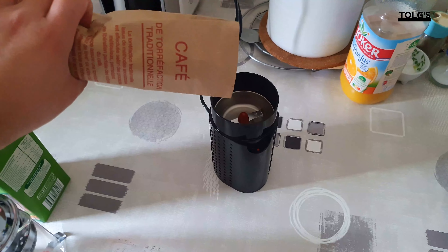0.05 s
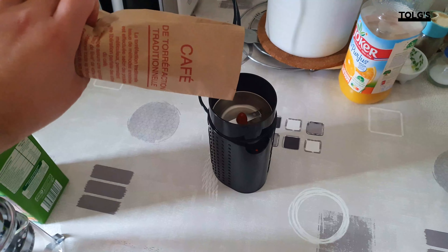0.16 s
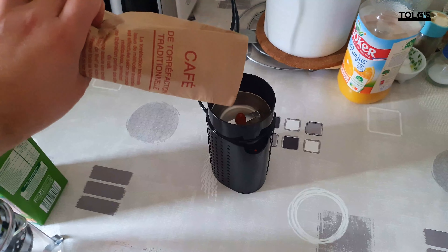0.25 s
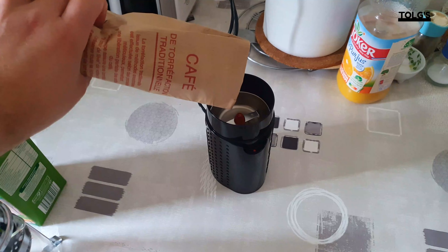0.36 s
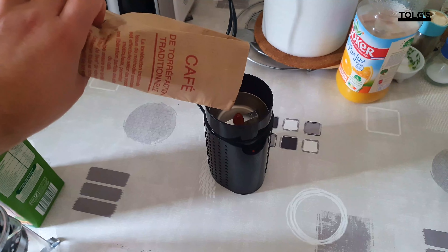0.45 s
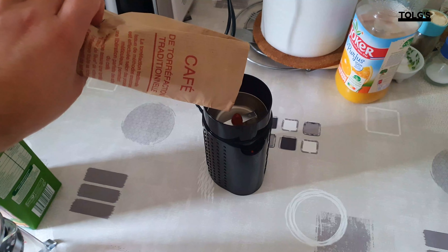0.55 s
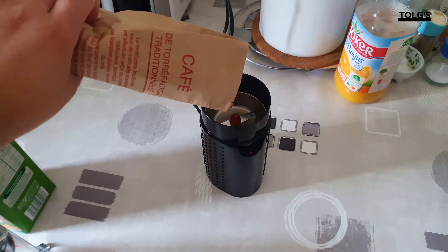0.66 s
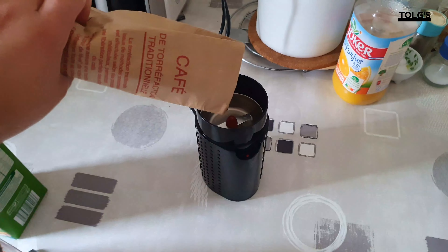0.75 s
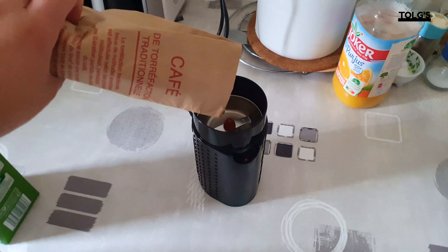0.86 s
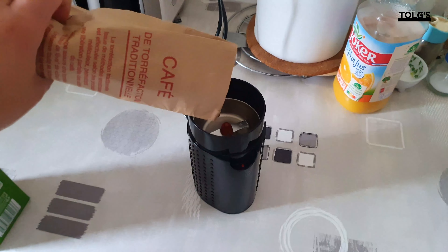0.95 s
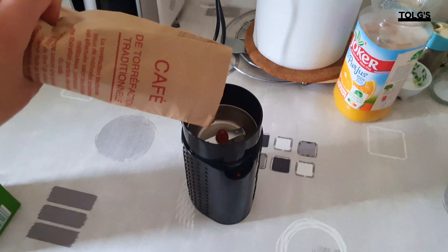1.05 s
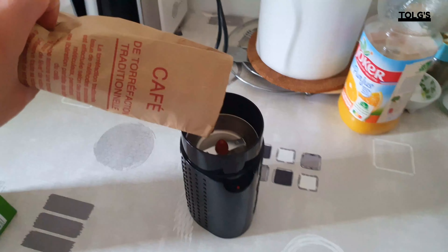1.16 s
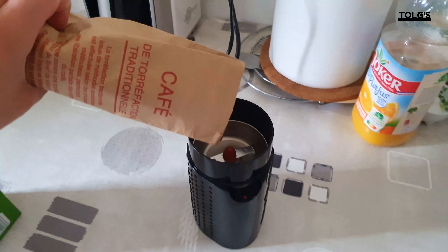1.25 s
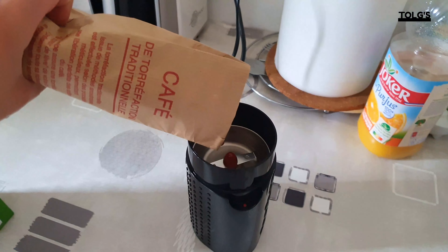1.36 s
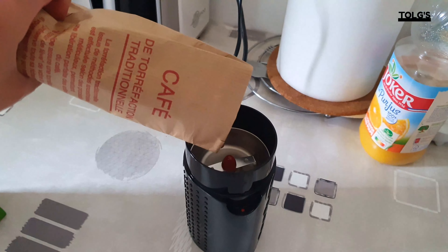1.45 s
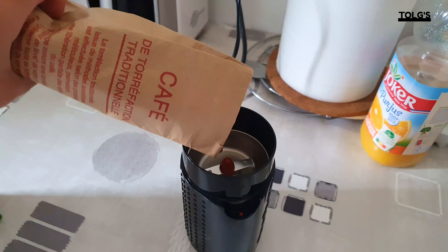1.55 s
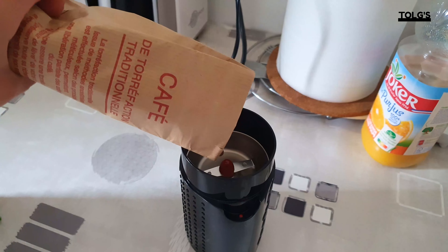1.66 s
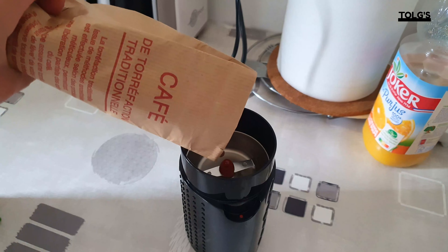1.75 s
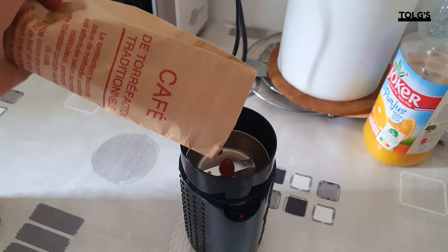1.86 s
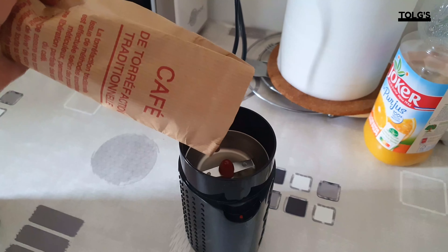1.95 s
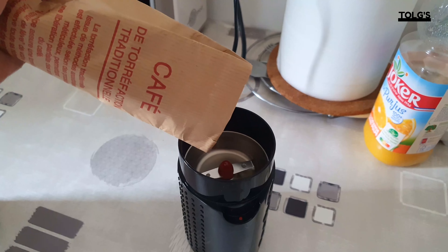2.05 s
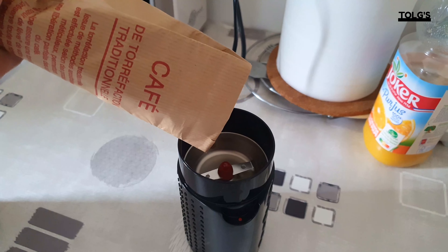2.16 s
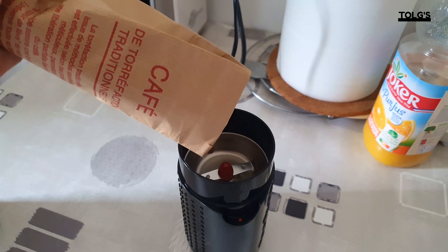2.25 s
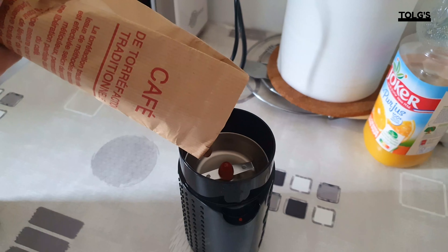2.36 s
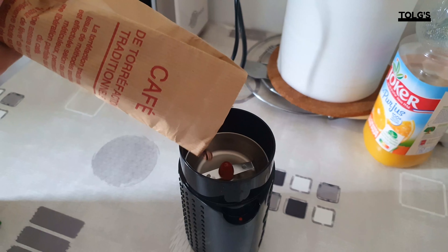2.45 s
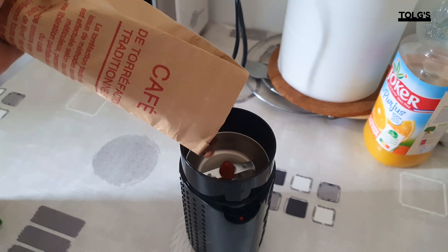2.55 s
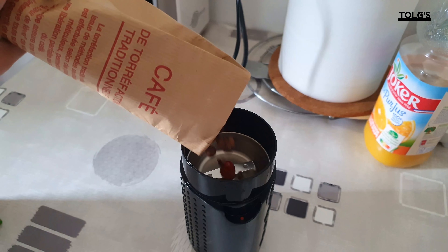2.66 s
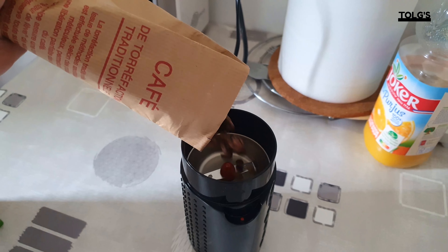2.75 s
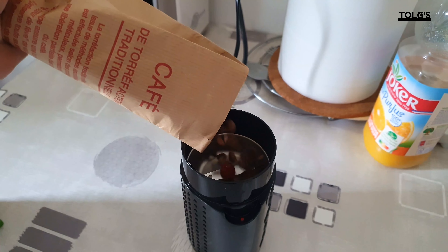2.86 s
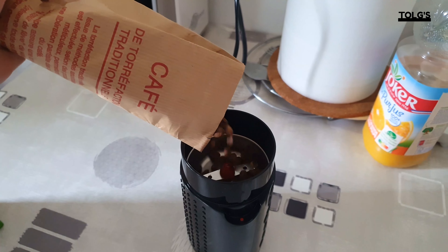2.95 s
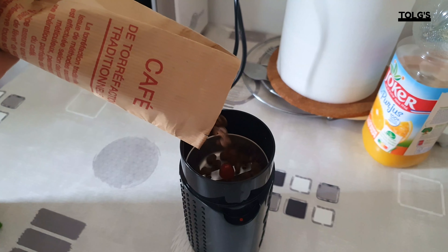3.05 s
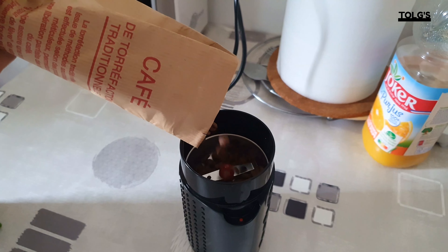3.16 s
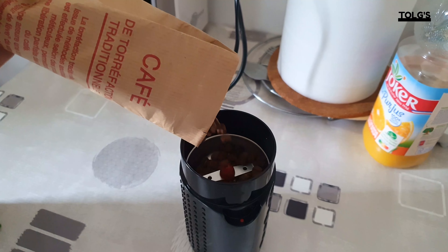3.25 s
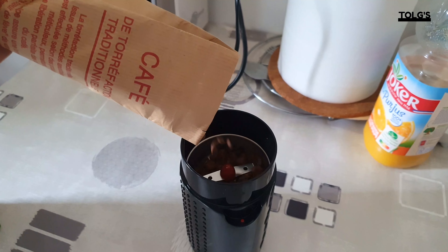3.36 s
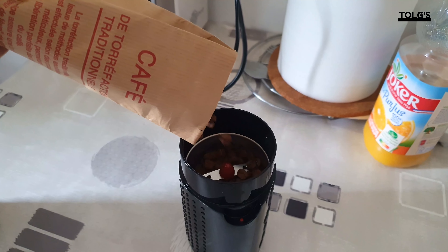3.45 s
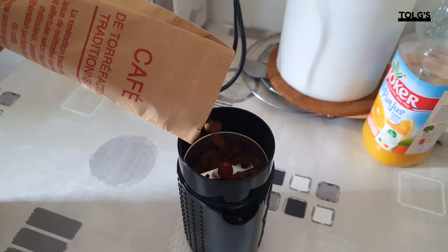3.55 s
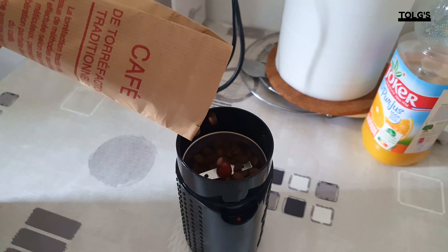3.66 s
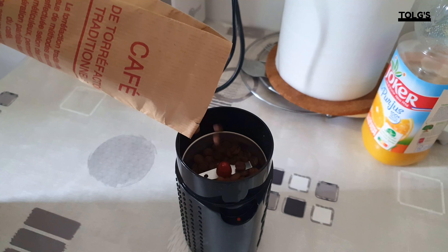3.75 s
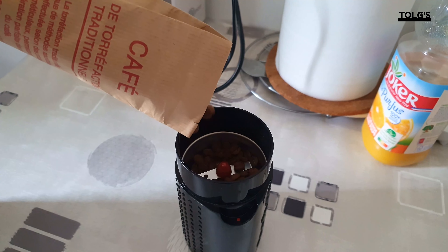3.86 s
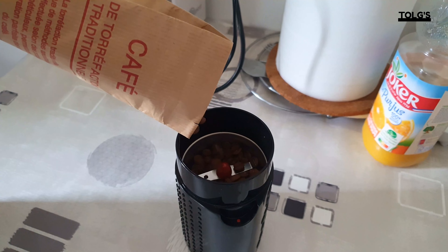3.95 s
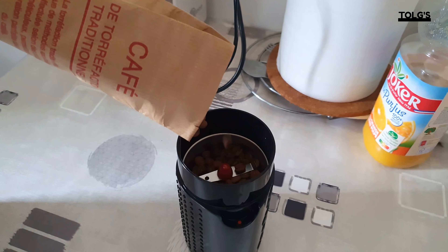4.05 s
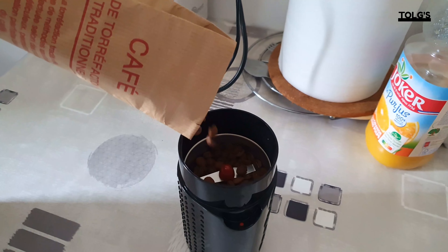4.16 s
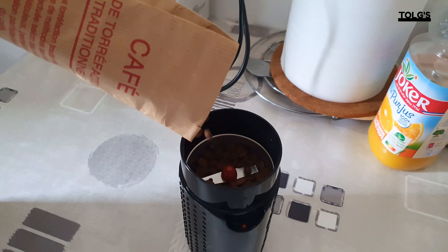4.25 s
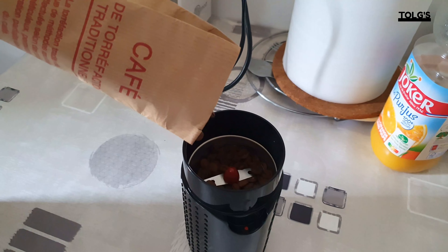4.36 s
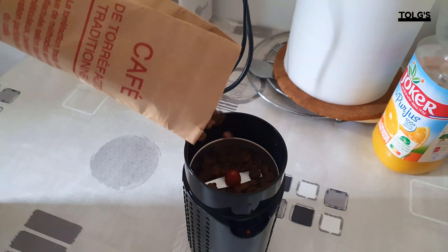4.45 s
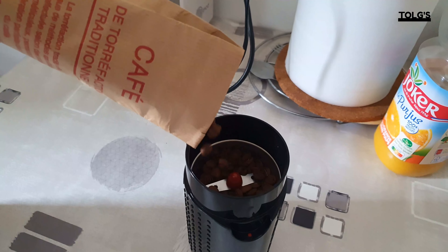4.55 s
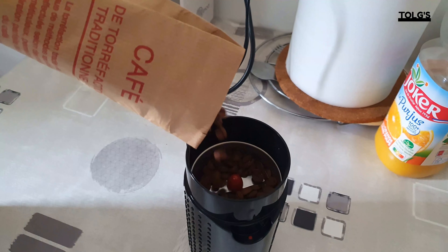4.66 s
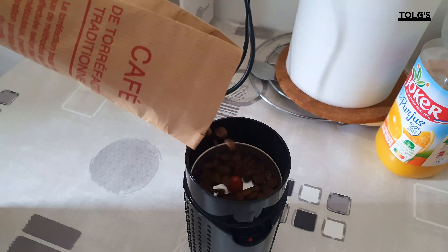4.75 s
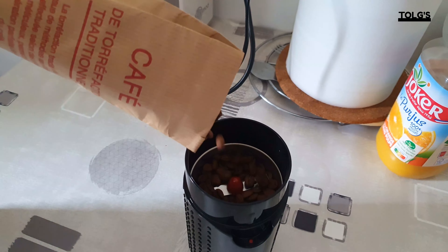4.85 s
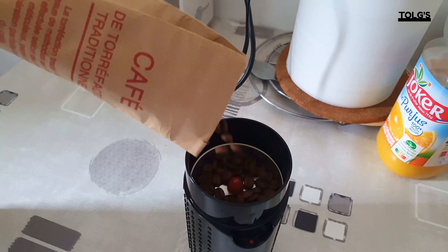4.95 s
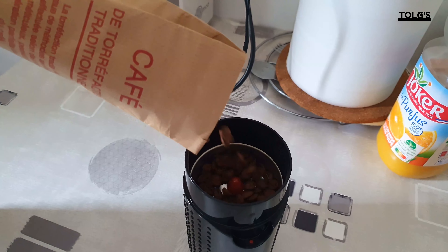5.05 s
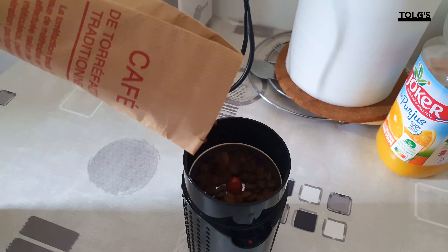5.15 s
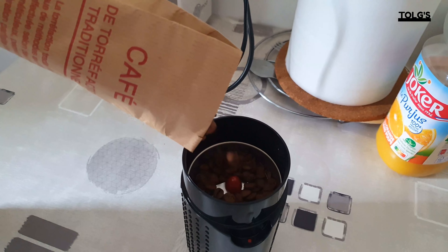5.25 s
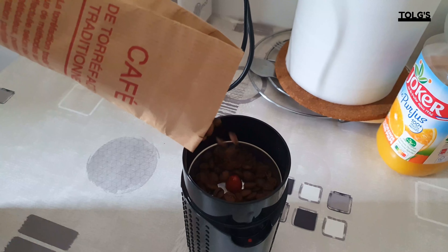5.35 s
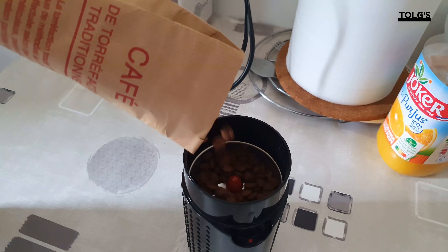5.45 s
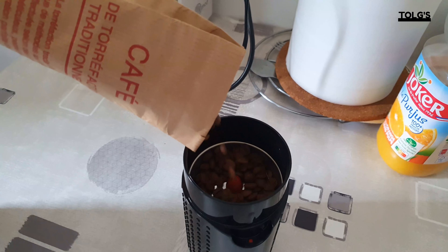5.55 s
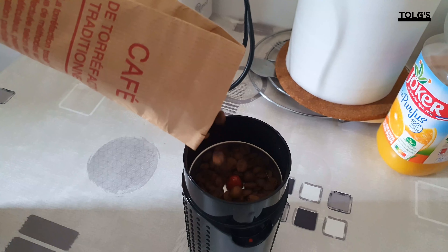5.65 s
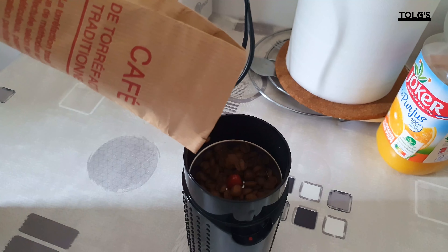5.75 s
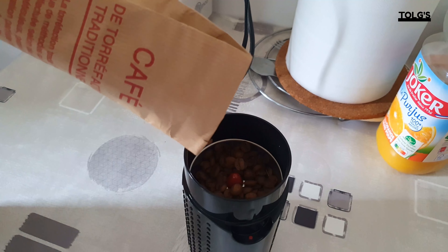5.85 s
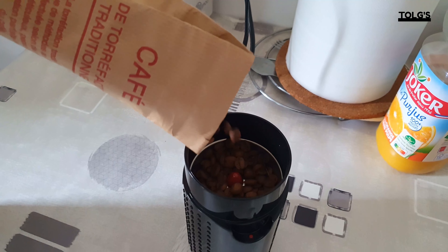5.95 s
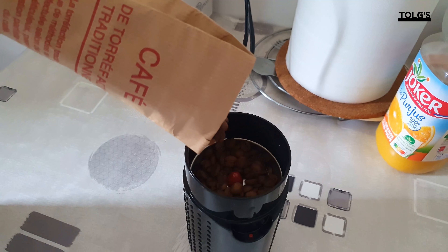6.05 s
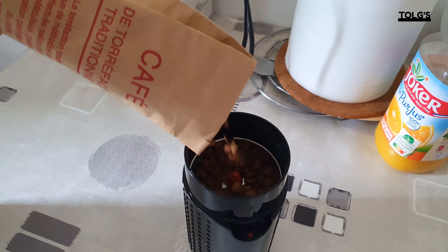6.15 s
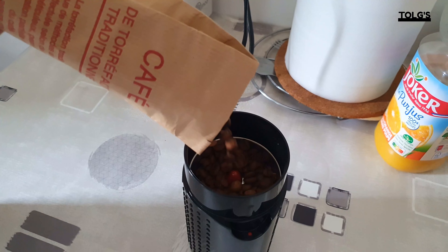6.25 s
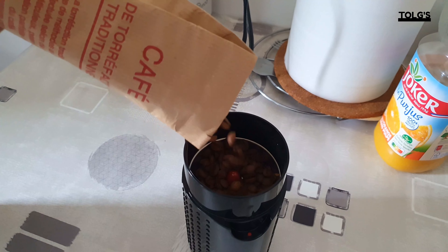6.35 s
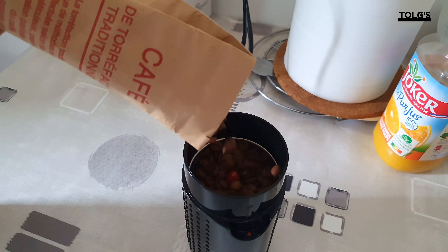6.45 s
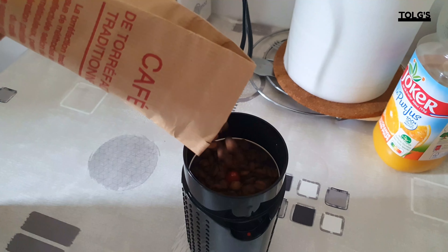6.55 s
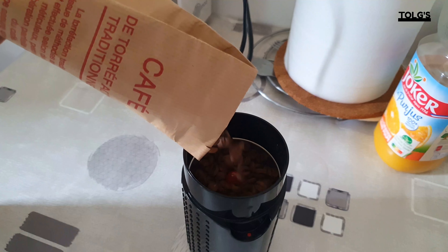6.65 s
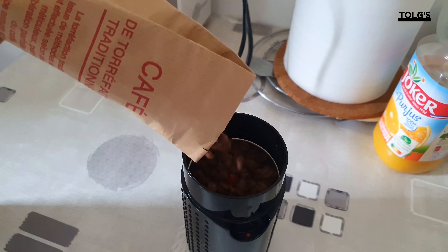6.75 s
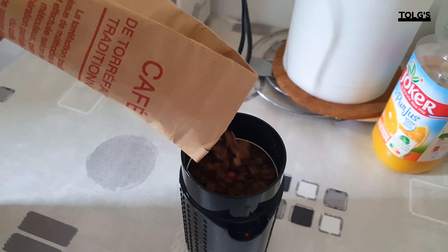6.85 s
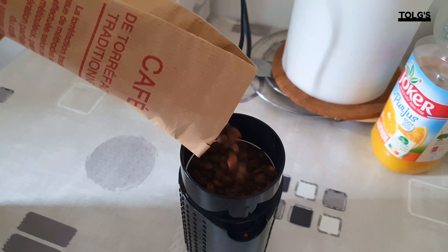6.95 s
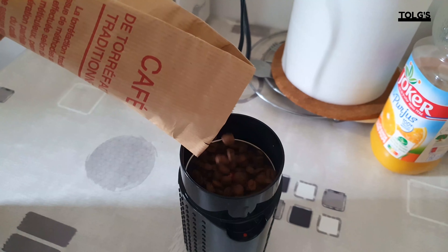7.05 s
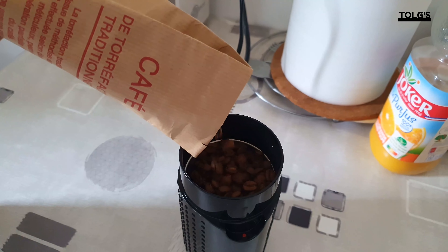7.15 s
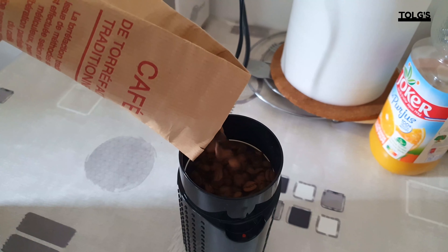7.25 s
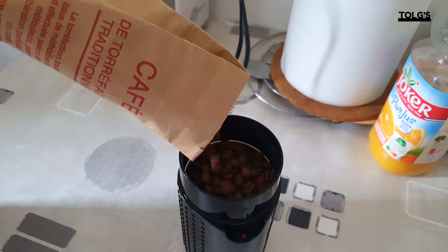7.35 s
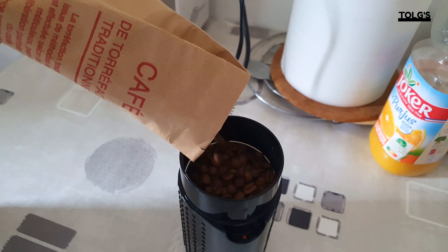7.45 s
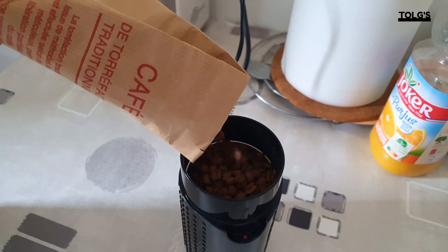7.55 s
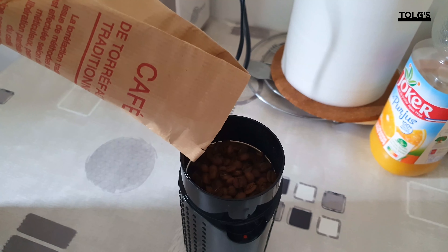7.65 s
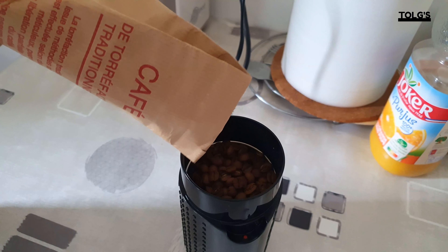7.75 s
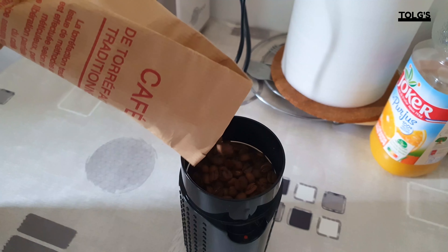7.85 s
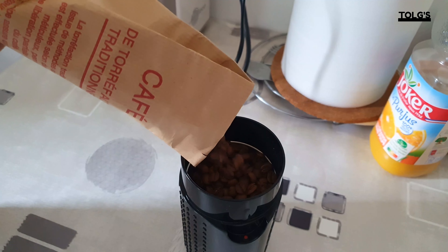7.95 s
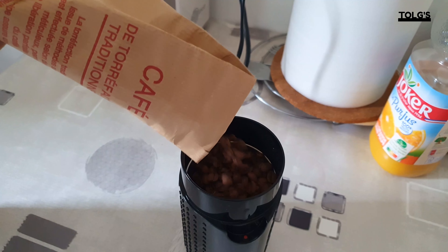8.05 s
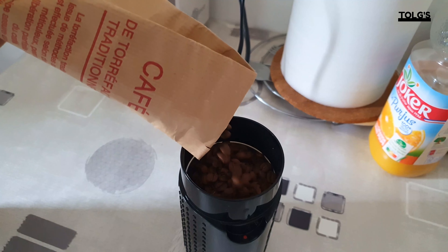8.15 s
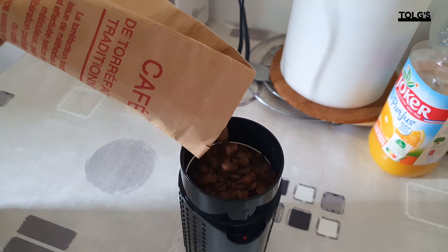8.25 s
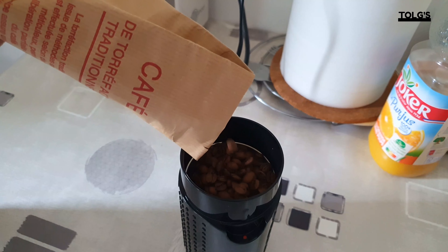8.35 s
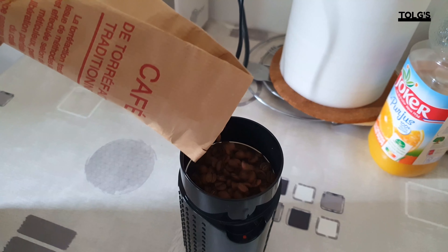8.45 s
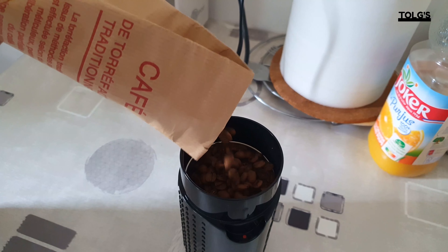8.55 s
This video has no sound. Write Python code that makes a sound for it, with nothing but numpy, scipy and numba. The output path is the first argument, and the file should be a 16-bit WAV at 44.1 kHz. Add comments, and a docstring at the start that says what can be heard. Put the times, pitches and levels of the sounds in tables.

```python
"""In a kitchen, close to a phone, roasted coffee beans slide from a tilted paper bag into a steel grinder bowl.
Each bean clicks, bounces and stirs the beans already there. The hits make the steel ring, less and less
as the heap covers it. The bag rustles as beans scrape the paper, knocks as they tap it and booms as
their weight shifts; its creases snap. Behind it all are one soft, low creak and a quiet, steady hiss."""
import sys
import numpy as np
from scipy import signal
from scipy.fft import rfft, irfft, next_fast_len
from scipy.io import wavfile
from scipy.ndimage import uniform_filter1d
from numba import njit

SR = 44100
rng = np.random.default_rng(int(sys.argv[2]) if len(sys.argv) > 2 else 0)


def materialize(psi):
    """Save the field psi as 16-bit PCM at rate SR to the path in sys.argv[1].

    A 1-D psi becomes a single channel; in a 2-D psi each row is a channel.
    """
    bounded = np.clip(np.atleast_2d(psi).T, -1, 1)
    quanta = np.round(bounded * 32767).astype(np.int16)
    wavfile.write(sys.argv[1], SR, quanta)


N = 379260

# A few faint clicks, then beans landing one by one: start_s, level_db, treble_share_db, knock_hz, tick_hz
CLICKS_AND_LANDINGS = [(2.2684, -50, -11, 3450, 9130), (2.2914, -39.5, -21, 3160, 7930),
                       (2.3457, -60, -8, 3370, 8720), (2.3951, -44, -11, 3540, 8300),
                       (2.4155, -50, -5, 3520, 8740), (2.4789, -45, -6, 3320, 12100),
                       (2.4968, -25.5, -4, 3950, 11900), (2.5387, -39, 0, 3110, 12600),
                       (2.5792, -26, -2, 4320, 9300), (2.624, -17.5, -9, 5030, 8450),
                       (2.641, -17.5, 0, 5230, 12700), (2.6809, -15.5, -11, 4600, 8600),
                       (2.7304, -14, -10, 4500, 8330), (2.7479, -17, -8, 4660, 13000),
                       (2.7622, -13, -9, 4600, 8350), (2.8006, -14, 0, 4370, 12900),
                       (2.858, -22, -21, 4430, 11600), (2.9239, -17, -5, 4350, 8400),
                       (2.98, -18, -8, 4300, 8200), (3.0242, -36, -3, 4570, 11600),
                       (3.0635, -19.5, 0, 4430, 12100), (3.096, -12.5, -7, 4240, 8600),
                       (3.1209, -15.5, -5, 4700, 8550), (3.1405, -13.5, -13, 4460, 8430),
                       (3.1911, -15, -2, 4660, 8500), (3.2336, -16.5, -2.5, 4670, 8770),
                       (3.2706, -16, -0.5, 4470, 8600), (3.3399, -17, -4, 4560, 8500),
                       (3.3723, -22, -1, 4680, 8360), (3.385, -18.5, -4, 5000, 11800),
                       (3.4172, -19, -2.5, 4430, 11400), (3.499, -24, 2, 5600, 11600),
                       (3.5415, -34, 1, 4270, 11400), (3.5604, -25.5, 0, 4940, 12000),
                       (3.573, -19.5, -4, 5070, 11700), (3.5933, -17, -6, 4580, 11400),
                       (3.6233, -14, 1, 6240, 11000), (3.6557, -19, -9, 5530, 13900),
                       (3.6698, -19, -6, 5730, 11500), (3.7058, -20, -4, 4600, 8410),
                       (3.7491, -22.5, -6, 5240, 10700), (3.8118, -21, -5.5, 4640, 8190),
                       (3.831, -17.5, -4, 4500, 11500), (3.8878, -20.5, -1, 6050, 11500),
                       (3.9705, -21.5, -12, 5200, 8550), (4.0027, -29, -6, 4950, 12200),
                       (4.018, -29, -11, 5050, 8200), (4.0665, -25.5, -5, 4700, 8590),
                       (4.1243, -23.5, -1.5, 4500, 12000), (4.153, -35, 1, 5080, 11800),
                       (4.177, -29.5, 1, 4600, 12200), (4.2413, -27, -3.5, 4940, 11800),
                       (4.2872, -20.5, -0.5, 4830, 11100), (4.354, -32.5, -10, 5200, 8830),
                       (4.3678, -30.5, -3, 3890, 12300), (4.3824, -24, 0.5, 3100, 14500),
                       (4.411, -28.5, -3.5, 5800, 11700), (4.4644, -35, -6, 5540, 10900),
                       (4.5062, -18.5, -8, 4900, 11800), (4.5641, -18, -16, 4600, 15300),
                       (4.5836, -32, 3, 4900, 15000), (4.607, -24, -4, 5100, 11700),
                       (4.6579, -27, -5, 4480, 15400), (4.6701, -16, -5, 4950, 11600),
                       (4.7327, -32, -7, 4940, 9830), (4.7761, -14.5, -7.5, 4600, 11700),
                       (4.7935, -18.5, 1, 4870, 12900), (4.8171, -32, -3, 4880, 11500),
                       (4.8764, -19, -2, 5100, 11400), (4.9345, -23.5, -17, 4660, 12600),
                       (4.9489, -22.5, -6, 4700, 8000), (5.0103, -31, -16, 3280, 11100),
                       (5.0317, -21, -8, 4900, 11700), (5.062, -31, -4, 4620, 13200),
                       (5.076, -26.5, 1, 4860, 13700), (5.105, -25, -3, 4230, 13000),
                       (5.1328, -18.5, -13, 4400, 11600), (5.1586, -19, -10, 4830, 11700),
                       (5.2033, -17.5, -6.5, 4140, 15400), (5.2463, -29, -7, 5120, 10100),
                       (5.2719, -24.5, -7, 4870, 11600), (5.299, -21, -2, 4700, 14400),
                       (5.3614, -38, -15, 5460, 7850), (5.3779, -17.5, -7, 4830, 7900),
                       (5.4037, -21.5, -3.5, 4220, 14800), (5.4368, -19, -4, 5540, 7800),
                       (5.4821, -28, -5, 5140, 11100), (5.501, -25.5, -0.5, 4800, 14800),
                       (5.5289, -23.5, -1.5, 4610, 9800), (5.5818, -22, -7, 6040, 8350),
                       (5.6078, -17, -8, 4400, 12200), (5.6787, -22, -9, 4550, 14800),
                       (5.727, -27.5, -18, 4850, 11900), (5.7664, -34, -6, 3780, 11600),
                       (5.7978, -36, -4, 5050, 9580), (5.8767, -30.5, -8, 4400, 11100),
                       (5.937, -38, -5, 4950, 11500), (6.0312, -37, 1, 4680, 12800),
                       (6.0535, -32.5, -3, 4630, 12700), (6.1197, -34, -3, 4670, 9960),
                       (6.1753, -26.5, -7, 4870, 14500), (6.1999, -30, 0, 5120, 12600),
                       (6.2127, -26, -2, 4970, 10700), (6.262, -18.5, -3, 5400, 12200),
                       (6.3077, -29, -5, 4590, 11700), (6.327, -37, -1, 5060, 11800),
                       (6.346, -24, -3, 4250, 15500), (6.381, -14, -4.5, 5390, 10500),
                       (6.4235, -24, -7, 5110, 10700), (6.4913, -29.5, -3, 5540, 8000),
                       (6.507, -29, 1, 5820, 7810), (6.5287, -28.5, -4.5, 4380, 11800),
                       (6.5677, -20.5, -3.5, 4700, 8000), (6.6329, -31, 3, 5810, 15300),
                       (6.6928, -18, -7, 5350, 8250), (6.7323, -25, 0, 5600, 14700),
                       (6.774, -24, -12, 3100, 8420), (6.812, -24.5, -17, 4400, 8380),
                       (6.839, -33, 4, 3660, 11900), (6.8968, -16, -11, 4730, 8100),
                       (6.9605, -19.5, -4.5, 4860, 13900), (6.9997, -22, -3, 5720, 8250),
                       (7.03, -27, -3, 4470, 12100), (7.0413, -24.5, 1, 3140, 12100),
                       (7.0557, -21.5, -5, 4630, 12300), (7.0879, -27, -3, 5600, 11600),
                       (7.121, -28, -2.5, 3360, 11600), (7.1396, -33, -0.5, 4610, 12400),
                       (7.1927, -50, 0.5, 4710, 12300), (7.2206, -44, 1, 3310, 12600),
                       (7.2346, -36, -1, 3020, 12600), (7.2555, -28.5, -1, 4270, 14000),
                       (7.2772, -28.5, 0.5, 3520, 10300), (7.305, -24.5, -1.5, 3260, 12300),
                       (7.332, -33, -6, 3020, 14300), (7.362, -31.5, -3, 3360, 13000),
                       (7.386, -25, -2.5, 3370, 13500), (7.4084, -23.5, -3, 3330, 11900),
                       (7.4364, -24, -2, 3670, 11800), (7.472, -30, -0.5, 3580, 11300),
                       (7.5139, -38, 2, 4050, 14700), (7.5452, -34, 0, 3260, 11300),
                       (7.5695, -32.5, 0, 3180, 13400), (7.6042, -33, 2, 3750, 12000),
                       (7.6421, -31, 1, 3000, 14500), (7.6606, -32.5, -7, 4700, 12100),
                       (7.7918, -55, -7, 3150, 7610), (7.8172, -58, -7, 3280, 7600),
                       (7.8614, -35, -6, 4210, 14900), (7.8926, -37, -14, 3280, 11500),
                       (7.916, -33, -5, 4200, 11700), (7.9415, -45, -3, 4710, 12400),
                       (7.9549, -39, -3, 3270, 13600), (7.9779, -36, -12, 3430, 11000),
                       (8.0068, -30, -0.5, 5920, 11300), (8.0396, -34, -1, 3310, 13000),
                       (8.0724, -25.5, -5.5, 4700, 12100), (8.111, -32, -1, 4640, 12100),
                       (8.1435, -23.5, -2, 3070, 12400), (8.1969, -28, -1, 4980, 12900),
                       (8.2464, -29.5, -4.5, 4470, 14100), (8.2704, -32.5, 6, 3920, 11500),
                       (8.3161, -33, -3, 3560, 13500), (8.353, -31.5, -0.5, 3030, 12100),
                       (8.4247, -37, -0.5, 4830, 15400), (8.4782, -43, -6, 5080, 8400),
                       (8.4852, -26.5, -3, 5600, 15500), (8.5331, -32.5, -2, 6600, 12200),
                       (8.583, -43, -1, 3840, 12500)]
# How hard the stream of beans jostles in the bowl: time_s, level_db
BEAN_FLOW = [(2.3, -83), (2.42, -78), (2.6, -50), (2.79, -32.5), (2.84, -27.5), (2.98, -31.5), (3.27, -35),
             (3.39, -43.5), (3.79, -41), (4.07, -56), (4.44, -57), (4.7, -40), (5.0, -58), (5.33, -60),
             (5.6, -42), (5.81, -62), (5.9, -78), (6.13, -78), (6.37, -45.5), (6.93, -39.5), (7.07, -53.5),
             (7.51, -48.5), (7.67, -92), (7.91, -60), (8.06, -44), (8.18, -47), (8.32, -61), (8.6, -56)]
# The bowl's own tones (a ring time is the time to fade by 60 dB): pitch_hz, level_db, ring_s
STEEL_TONES = [(3526, -42, 0.12), (4180, -39, 0.1), (4300, -37, 0.09), (4405, -34, 0.09), (4570, -37, 0.07),
               (4675, -37, 0.07), (4790, -39, 0.06), (4945, -38, 0.06), (5055, -41, 0.07),
               (5260, -38, 0.033), (8430, -40, 0.033), (11740, -38, .07), (12240, -44, 0.06)]
# The steel rings less as the heap grows: time_s, gain_db
HEAP_MUFFLING = [(2.3, -2), (3.5, -2), (4.8, -5), (5.8, -9), (6.6, -14), (8.6, -22)]
# Beans that hit bare steel and leave one tone singing: start_s, level_db, rough_pitch_hz
STEEL_PINGS = [(2.625, -38, 4300), (2.682, -35, 4360), (2.731, -37, 4410), (2.86, -33, 4410),
               (3.096, -30, 4420), (3.972, -33, 5050), (4.019, -28.5, 5050), (4.125, -37, 4410),
               (4.126, -40, 11900), (4.178, -34.5, 4670), (4.179, -34, 11600), (4.243, -24.5, 5050),
               (4.287, -39, 11750), (4.62, -25, 5050), (4.679, -20.5, 5050), (4.735, -32, 5100),
               (4.795, -26, 4900), (5.727, -39, 5130), (5.767, -39, 11550), (5.878, -47, 11400),
               (6.053, -39, 4670), (6.177, -28.5, 5050), (7.41, -51, 11750)]

# Beans scraping along the paper: time_s, level_db
SCRAPE_LEVELS = [(0.0, -56.5), (0.07, -52), (0.19, -65), (0.36, -59), (0.41, -45.5), (0.55, -40),
                 (0.61, -40.5), (0.76, -43.5), (0.9, -52.5), (1.05, -67), (1.2, -77), (1.45, -75.5),
                 (1.92, -66), (2.08, -56.5), (2.23, -61.5), (2.44, -49.5), (2.72, -43.5), (2.78, -38),
                 (2.94, -56), (3.0, -49), (3.71, -54), (4.19, -62.5), (4.5, -55.5), (4.72, -52.5),
                 (4.86, -60.5), (5.1, -51), (5.29, -52), (5.36, -55.5), (5.4, -49.5), (5.89, -65.5),
                 (5.96, -54.5), (6.1, -59), (6.42, -50), (6.59, -51), (7.04, -47.5), (7.11, -54),
                 (7.5, -56), (7.76, -70), (7.82, -60), (7.87, -53), (8.14, -49.5), (8.21, -51.5),
                 (8.6, -57.5)]
# The tone colour of that scrape: frequency_hz, gain_db
SCRAPE_COLOUR = [(210, -32), (350, -13.5), (391, -12.5), (481, -11.5), (864, -6.5), (1130, -8), (2390, -6),
                 (4500, -16.5), (7130, -27.5), (15500, -28)]
# The weight of the beans shifting against the bag walls: time_s, level_db
BOOM_LEVELS = [(0.0, -74), (0.07, -66), (0.29, -72), (0.45, -60), (0.62, -45), (0.93, -52.5), (0.96, -60),
               (1.12, -69), (1.34, -61), (1.39, -76), (1.84, -69.5), (2.85, -51), (3.64, -63.5),
               (3.69, -55), (3.78, -64), (4.5, -67.5), (4.67, -53), (4.88, -65.5), (5.1, -54.5),
               (6.15, -68), (6.2, -55.5), (6.37, -57.5), (6.42, -53), (6.52, -63), (6.7, -52.5),
               (7.62, -61), (7.74, -64), (8.17, -55.5), (8.48, -62), (8.6, -59)]
# The tone colour of the booming walls: frequency_hz, gain_db
BOOM_COLOUR = [(15, -43), (25, -23), (81, 1.5), (210, -1), (243, -2.5), (306, 0.5), (345, -10.5), (394, -4),
               (450, -22), (580, -19), (990, -120)]
# How loud beans patter on the bag, compared with the scrape: time_s, offset_db
PATTER_OFFSETS = [(0, 1.5), (.4, -3), (1.0, -3.5), (1.95, 0.5), (2.3, 2.5), (3.0, -3), (3.5, -12),
                  (3.7, -15), (4.8, -11), (5.0, -11), (5.9, -10), (6.5, 5.5), (6.6, -9.5), (8.6, -8)]
# Single beans that tap the hollow bag: start_s, level_db, pitch_hz
BAG_TAPS = [(0.031, -40, 786), (0.09, -39, 920), (0.389, -40, 700), (0.411, -34, 988), (0.453, -40, 684),
            (0.519, -34, 960), (0.604, -29, 880), (0.667, -33, 890), (0.725, -33, 794), (0.797, -36, 856),
            (0.846, -37, 907), (0.947, -39, 869), (1.234, -48, 619), (1.982, -36.5, 860), (2.037, -39, 890),
            (2.052, -35.5, 890), (2.396, -39, 745), (2.415, -35.5, 735), (2.465, -41, 826),
            (2.575, -32, 850), (2.687, -37, 586), (2.73, -29, 830), (2.818, -43, 662), (2.878, -30.5, 740),
            (2.977, -28.5, 756), (3.394, -43, 725), (3.473, -34.5, 990), (4.891, -44, 776),
            (5.182, -44, 921), (5.378, -39, 604), (6.465, -36, 738), (6.525, -32.5, 885), (7.02, -41, 732),
            (8.182, -47, 960)]
# Creases that snap in the paper: start_s, level_db, pitch_hz, left_minus_right_db
CREASE_SNAPS = [(0.0587, -41, 3290, 12), (0.091, -48, 2500, -0.5), (0.188, -30.5, 4500, -6),
                (0.3895, -51, 2500, -2.5), (0.421, -33, 2730, 2), (0.558, -32.5, 4350, -10),
                (0.602, -26.5, 2760, 5), (1.233, -50, 2500, -10), (1.2384, -55, 2530, -7)]

# The tone colour of the kitchen hiss: frequency_hz, gain_db
HISS_COLOUR = [(18, -38), (30, 5), (64, 6), (111, 15.5), (596, -29), (883, -45.5), (1420, -19.5),
               (1990, 15.5), (2800, -51), (4610, -3), (7010, -11), (8870, -3), (12200, -16), (14600, -24),
               (15800, -15)]
# Narrow bands that stand out of the hiss: centre_hz, width_hz, level_db
HISS_BANDS = [(2000, 260, -63.5), (4540, 340, -75), (7800, 160, -83.5), (8480, 320, -78)]
# How alike left and right are in spread-out sound: frequency_hz, likeness (1 = same, 0 = unrelated)
STEREO_LIKENESS = [(60, 1), (130, 0.97), (290, 0.87), (640, 0.53), (1410, 0.16), (3100, 0.057),
                   (6820, 0.089), (15000, -0.03)]
# How the phone's two microphones differ: frequency_hz, left_minus_right_db
MIC_BALANCE = [(60, 7), (110, -9.5), (200, 1.5), (380, -1.5), (700, 0.5), (1290, -2.5), (2380, -2.5),
               (4400, -6), (8120, 2), (15000, -1.5)]

STIR_DB, STIR_FADE_S = -16, .14  # a landing stirs the heap: level against the landing, time to settle
JOSTLE_TREBLE_DB, TREBLE_DB_PER_S = -4.5, -0.33  # the jostles' treble share starts here, then falls
SURGE_DB, SURGES_PER_S = 1.24, 30  # how unevenly the beans slide


def landings(pan_db=2.5, pan_range_db=6.5):
    """Faint clicks, then landing beans, at random spots mostly a little to the left: rows for clicks()."""
    pans = pan_db + pan_range_db * (rng.random((len(CLICKS_AND_LANDINGS), 1)) - .5)
    return np.c_[CLICKS_AND_LANDINGS, pans]


def bounces(rows, count=4, span_s=0.042, first_db=-11, fade_db=-9):
    """Each hit is followed by a few weaker ones of nearby pitch; later ones are softer."""
    after = np.repeat(np.array(rows, float), count, axis=0)
    delay, softness, knock, tick = rng.random((len(after), 4)).T
    after[:, 0] = np.minimum(after[:, 0] + .004 + span_s * delay ** 1.5, (N - 1) / SR)
    after[:, 1] += first_db + fade_db * delay - 0.6 * softness
    after[:, 3] *= 0.93 + 0.34 * knock
    after[:, 4] = np.clip(after[:, 4] * (0.693 + 0.37 * tick), 7000, 15500)
    return np.r_[rows, after]


def jostles(count=4000):
    """Small bumps in the heap follow the flow and flare after each landing: rows for clicks()."""
    when, force, knock, tick, side, treble = rng.random((count, 6)).T
    first_s = BEAN_FLOW[0][0]
    start_s = first_s + (N / SR - first_s) * when
    hit_s, hit_db = np.transpose(CLICKS_AND_LANDINGS)[:2]
    since_s = start_s[:, None] - hit_s
    stir_db = hit_db + STIR_DB - 60 * np.abs(since_s) / STIR_FADE_S
    stir_power = np.sum((since_s > 0) * undb(2 * stir_db), axis=1)
    flow_power = undb(2 * curve(BEAN_FLOW)[(start_s * SR).astype(int)])
    db = 10 * np.log10(flow_power + stir_power)
    db += np.minimum(-2.5 * np.log(force + 1e-9), 16.0)  # a few are much harder
    treble_db = JOSTLE_TREBLE_DB + TREBLE_DB_PER_S * (start_s - first_s) + 4.1 * (treble - .5)
    return np.c_[start_s, db, treble_db, 3400 + 2400 * knock, 7500 + 8000 * tick, 10.5 * (side - .5)]


def clicks(start_s, db, treble_db, knock_hz, tick_hz, pan_db, knock_s=0.0032, tick_s=0.003):
    """A hard hit gives short knocks and higher ticks; each microphone hears them differently."""
    out = np.zeros((2, N))
    right_lag_s = 4.5 / SR
    treble = np.clip(undb(treble_db), .1, .95)
    body = np.sqrt(1 - treble ** 2)
    chance = rng.random((len(start_s), 6, 5))  # five dice for each of a hit's six tones
    pitch = chance[:, :, 4].T
    tones = [(knock_hz, knock_s, 1.48 * body), (tick_hz, tick_s, 1.41 * treble),
             (3000 + 800 * pitch[2], knock_s, 0.37 * body),
             (5200 + 1600 * pitch[3], knock_s, 0.53 * body),
             (7000 + 4200 * pitch[4], tick_s, 0.93 * treble),
             (11200 + 4400 * pitch[5], tick_s, 1.22 * treble)]
    for k, (hz, ring_s, size) in enumerate(tones):
        late = min(k, 1) * chance[:, k, 0]  # the main knock comes first
        fade_s = ring_s * (0.6 + 0.49 * chance[:, 5 - k, 3])
        for mic, sign in enumerate((1, -1)):
            start = ((start_s + mic * right_lag_s + .0012 * late) * SR).astype(np.int64)
            scatter_db = 2 * chance[:, k, 1 + mic] - 1
            gain = size * undb(db + sign * pan_db / 2 + scatter_db)
            phase = 2 * np.pi * (chance[:, k, 3] + mic * late)
            add_rings(out[mic], start, 1. * hz, fade_s, gain, phase)
    return out


def bowl(rows, spots=3):
    """Beans hit different spots; from each, the bowl echoes and its tones ring in another mix."""
    t, out = np.arange(int(.25 * SR)) / SR, 0
    # a bean is too small to give off much sound below 3 kHz
    low_cut = signal.butter(4, 2650, "high", fs=SR, output="sos")
    for spot in range(spots):
        hits = signal.sosfilt(low_cut, clicks(*rows[spot::spots].T))
        ring = 0
        for hz, db, ring_s in STEEL_TONES:
            strength, phase = rng.random((2, 2, 1))
            fade = undb(db + 5.8 * (strength - 1.5)) * np.exp(-np.log(1000) * t / ring_s)
            ring = ring + fade * np.sin(2 * np.pi * (hz * t + phase))
        steel = convolve(hits * undb(curve(HEAP_MUFFLING)), ring)
        walls = convolve(hits, echoes(fade_s=.035, start_s=.001, db=-6.5))
        out = out + room(hits + walls + steel)
    return out


def pings():
    """The nearest steel tone sings alone, briefly, for half its usual ring time."""
    start_s, db, rough_hz = np.transpose(STEEL_PINGS)
    tone_hz, _, ring_s = np.transpose(STEEL_TONES)
    nearest = np.abs(rough_hz[:, None] - tone_hz).argmin(axis=1)
    return rings(start_s, db, tone_hz[nearest], ring_s[nearest] / 2, lag_samples=4)


def bag():
    """Beans slide down the bag in uneven surges: it rustles, booms, patters and snaps."""
    scrape_db = curve(SCRAPE_LEVELS) + SURGE_DB * wander(SURGES_PER_S)
    boom_db = curve(BOOM_LEVELS) + SURGE_DB * wander(SURGES_PER_S)
    patter_db = scrape_db + curve(PATTER_OFFSETS) + 2 * SURGE_DB * wander(SURGES_PER_S)
    return scrape(scrape_db) + boom(boom_db) + patter(patter_db) + creases() + taps()


def scrape(db):
    """Beans rub over the paper; every tiny slip lifts the noise for a few milliseconds."""
    slips = (rng.random(N) < .012) * undb(3.8 * rng.exponential(size=N))
    grain = np.sqrt(.5 + signal.lfilter([1], [1, -.99], np.minimum(slips, 9.0)))
    rustle = colour(grain * wide_noise(), SCRAPE_COLOUR)
    middle = signal.sosfilt(signal.butter(2, (1100, 2500), "band", fs=SR, output="sos"), rustle)
    return rustle / middle.std() * undb(db)  # db sets the level of the middle band


def boom(db):
    """Shifting weight moves the bag walls, which give a low rumble."""
    return level(colour(wide_noise(), BOOM_COLOUR), 0) * undb(db)


def patter(db, count=1500):
    """Many beans knock lightly on the hollow bag at random times."""
    when, force, pitch = rng.random((count, 3)).T
    start_s = when * (N - 1) / SR
    hit_db = db[(start_s * SR).astype(int)] + 9.0 * force ** 2
    return rings(start_s, hit_db, 560 + 520 * pitch, ring_s=.013)


def creases():
    """A crease gives way with a snap and a trail of smaller crackles."""
    start_s, db, hz, pan_db = np.transpose(CREASE_SNAPS)
    treble_db = np.full(len(start_s), -17)
    snaps = np.c_[start_s, db, treble_db, hz, 1.7 * hz, pan_db]
    crackles = bounces(snaps, count=40, span_s=.08, fade_db=-15)
    return clicks(*crackles.T, knock_s=.002, tick_s=.0015)


def taps(knocks=3):
    """A bean taps the paper: a short knock with weaker ones of other pitch just behind."""
    start_s, db, hz = np.repeat(np.array(BAG_TAPS), knocks, axis=0).T
    delay, pitch = rng.random((len(start_s), 2)).T
    follows = np.arange(len(start_s)) % knocks > 0
    hz = hz * (1 + follows * .6 * (pitch - .4))
    return rings(start_s + follows * 0.0122 * delay, db - 11.0 * follows, hz, ring_s=0.014)


def creak(count=9, start_s=1.247, gap_s=.0128, db=-56, pitch_hz=95):
    """Soft, low slips come at a nearly even pace, a little unequal in strength."""
    timing, force = rng.random((count, 2)).T - .5
    slip_s = start_s + gap_s * (np.arange(count) + 0.091 * timing)
    return rings(slip_s, db + 4.0 * force, np.full(count, pitch_hz), ring_s=0.032)


def room(x):
    """Tiles and cupboards answer with a short tail, duller than the source."""
    tail = signal.lfilter([.75], [1, -.25], echoes(fade_s=0.36, start_s=0.003, db=-9))
    return x + convolve(x, tail)


def kitchen_hiss(hiss_db=-64.5):
    """The kitchen hisses steadily, with a few narrow bands standing out."""
    out = level(colour(wide_noise(), HISS_COLOUR), hiss_db)
    for hz, width, db in HISS_BANDS:
        band = signal.butter(2, (hz - width / 2, hz + width / 2), "band", fs=SR, output="sos")
        out = out + level(signal.sosfilt(band, rng.standard_normal((2, N))), db)
    return out


def echoes(fade_s, start_s, db):
    """A fading swarm of echoes for each side, evened out so that no pitch stands out."""
    t = np.arange(int(.4 * SR)) / SR
    shape = np.exp(-np.log(1000) * t / fade_s) * (t > start_s)
    tail = rng.standard_normal((2, len(t))) * shape
    for _ in range(3):
        bins = rfft(tail)
        tail = irfft(bins / np.abs(bins), len(t))  # make all frequencies equally strong
        tail = tail / np.sqrt(uniform_filter1d(tail ** 2, size=256) + 1e-18) * shape  # restore the fade
    return undb(db) * tail / np.sqrt(np.sum(tail ** 2, axis=1, keepdims=True))


def rings(start_s, db, hz, ring_s, lag_samples=9):
    """Plain fading tones that reach the left microphone first."""
    out, zeros = np.zeros(N), np.zeros(len(start_s))
    add_rings(out, (start_s * SR).astype(np.int64), 1. * hz, ring_s + zeros, undb(db), zeros)
    return np.array([out, np.roll(out, lag_samples)])


@njit
def add_rings(out, start, hz, ring_s, gain, phase):
    """Add one tone for each hit: it rises quickly, then dies away."""
    for k in range(len(start)):
        fall = np.log(1000) / (ring_s[k] * SR)
        for i in range(min(int(ring_s[k] * SR), len(out) - start[k])):
            shape = np.exp(-fall * i) - np.exp(-max(4 * fall, .03) * i)
            out[start[k] + i] += 2 * gain[k] * shape * np.sin(2 * np.pi * hz[k] * i / SR + phase[k])


def wide_noise():
    """Noise whose left and right are alike in the bass and unrelated in the treble."""
    a, b = rng.standard_normal((2, N))
    n = next_fast_len(N)
    likeness = np.clip(over_hz(STEREO_LIKENESS, n), -.95, .95)
    mid, side = rfft(a, n) * np.sqrt(1 + likeness), rfft(b, n) * np.sqrt(1 - likeness)
    return irfft(np.array([mid + side, mid - side]), n)[:, :N] / np.sqrt(2)


def wander(steps_per_s):
    """A smooth random wobble, mostly between -1 and 1."""
    hold = int(SR / steps_per_s)
    steps = np.repeat(rng.standard_normal(N // hold + 1), hold)
    return 1.2 * uniform_filter1d(uniform_filter1d(steps, hold), hold)[:N]


def convolve(x, response):
    """Let every sample of a sound set off the same ring or echo."""
    return signal.fftconvolve(x, response, axes=1)[:, :N]


def colour(x, table):
    """Turn frequencies up or down by a table of frequency_hz, gain_db."""
    n = next_fast_len(N)
    return irfft(rfft(x, n) * undb(over_hz(table, n)), n)[..., :N]


def over_hz(table, n):
    """A table's value at each frequency of an n-sample spectrum."""
    hz, value = np.transpose(table)
    return np.interp(np.log(np.arange(n // 2 + 1) * SR / n + 1), np.log(hz), value)


def curve(table):
    """Join a time table's points with straight lines, one value a sample."""
    return np.interp(np.arange(N) / SR, *np.transpose(table))


def level(x, db):
    """Scale a sound to an average (rms) level."""
    return x * undb(db) / np.sqrt(np.mean(x ** 2))


def undb(db):
    """Turn decibels into a plain multiplier."""
    return 10 ** (np.asarray(db) / 20)


def scene():
    """Beans in the bowl and the bag above it, in the kitchen."""
    hits = np.r_[bounces(landings()), jostles()]
    return bowl(hits) + room(pings() + bag()) + creak() + kitchen_hiss()


def record(dry):
    """The phone's two microphones differ in tone colour, and the highest treble is cut."""
    hz, db = np.transpose(MIC_BALANCE)
    left, right = colour(dry[0], np.c_[hz, db / 2]), colour(dry[1], np.c_[hz, -db / 2])
    top_hz = 15750
    return signal.sosfilt(signal.ellip(10, .2, 60, top_hz, fs=SR, output="sos"), np.array([left, right]))


dry = scene()
out = record(dry)
materialize(out)
```